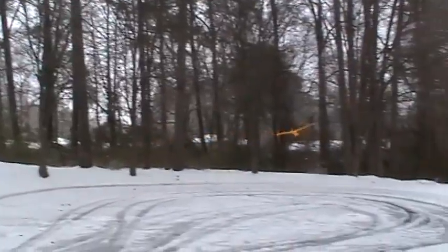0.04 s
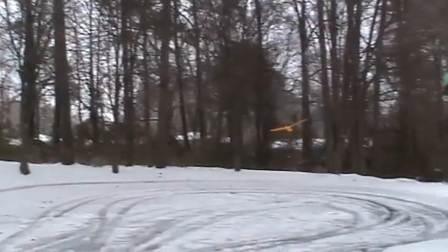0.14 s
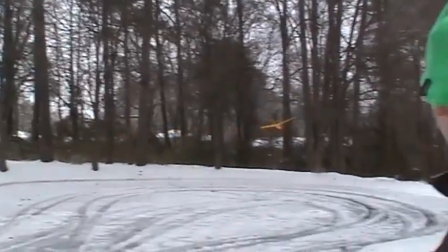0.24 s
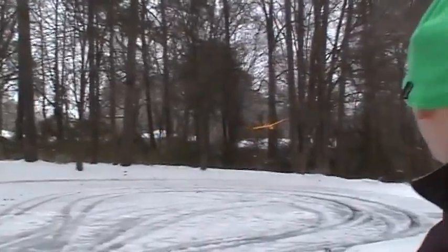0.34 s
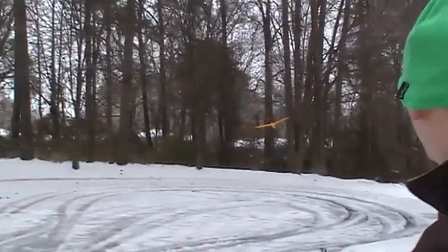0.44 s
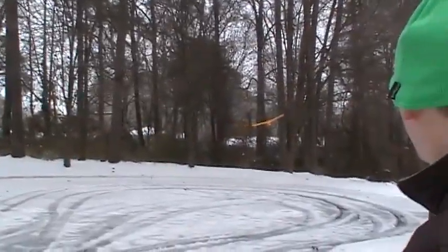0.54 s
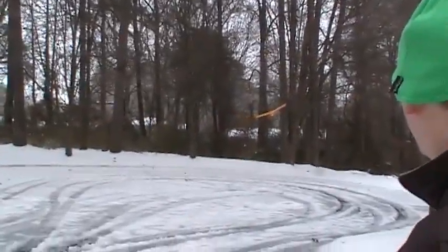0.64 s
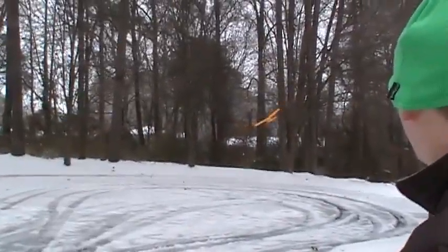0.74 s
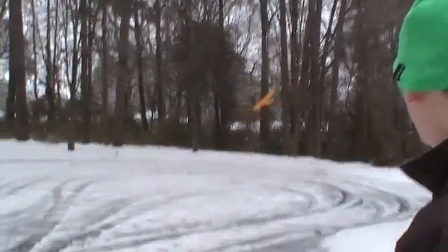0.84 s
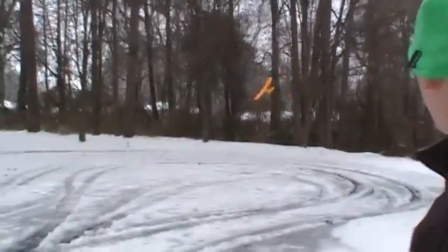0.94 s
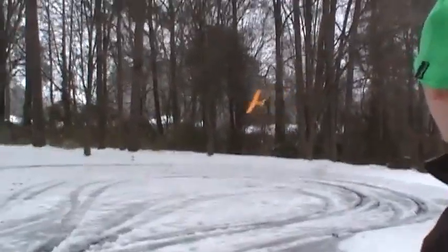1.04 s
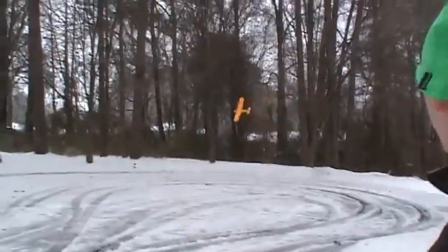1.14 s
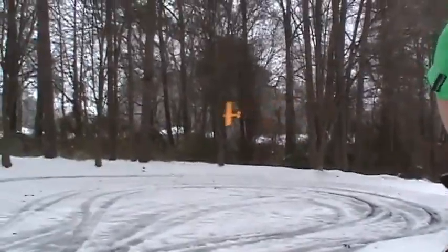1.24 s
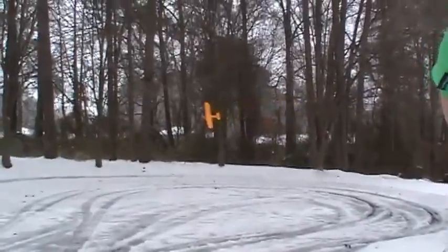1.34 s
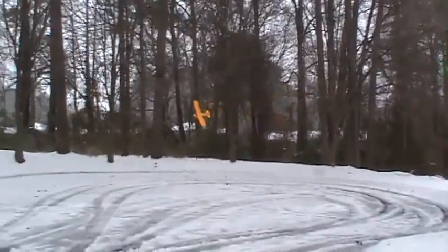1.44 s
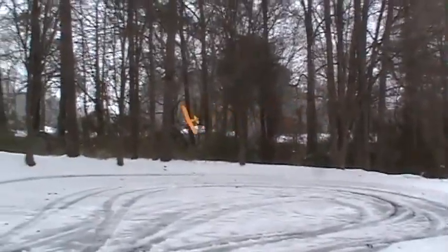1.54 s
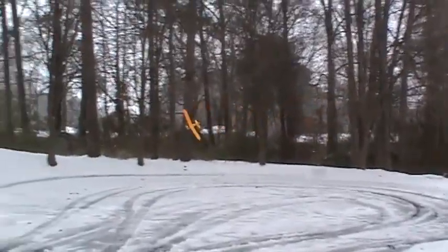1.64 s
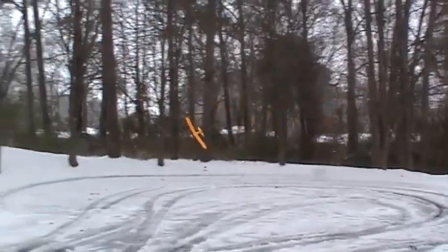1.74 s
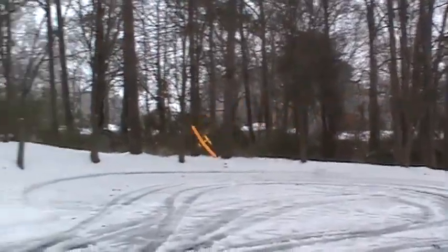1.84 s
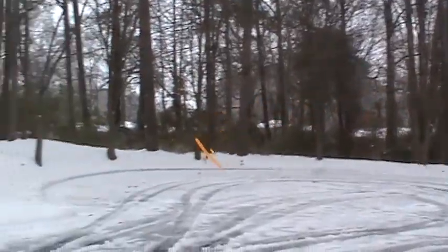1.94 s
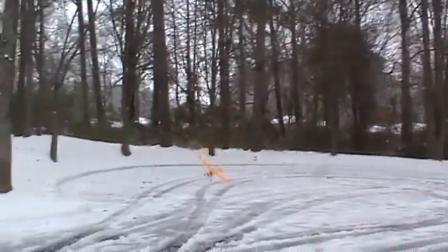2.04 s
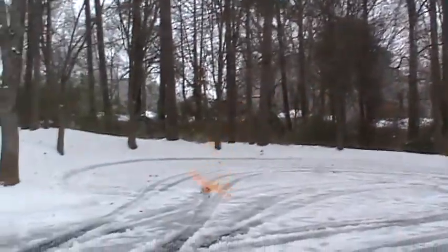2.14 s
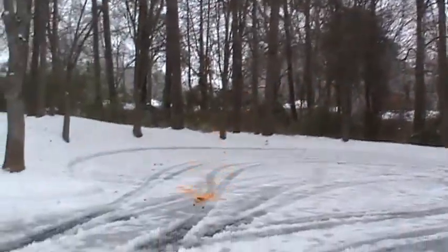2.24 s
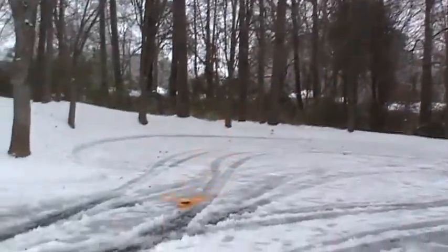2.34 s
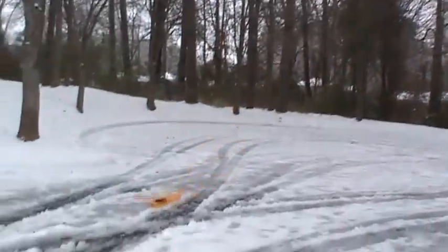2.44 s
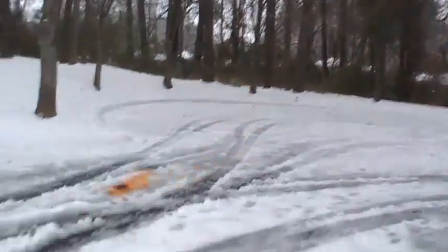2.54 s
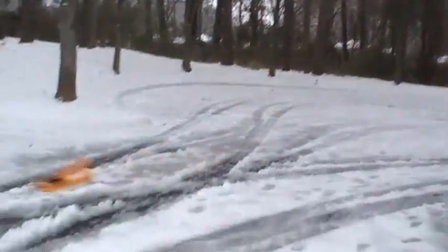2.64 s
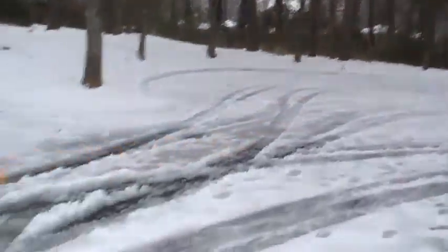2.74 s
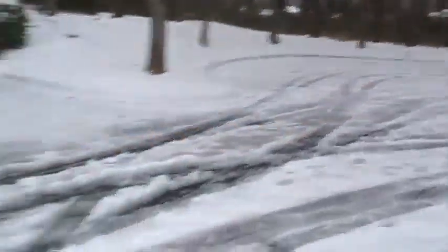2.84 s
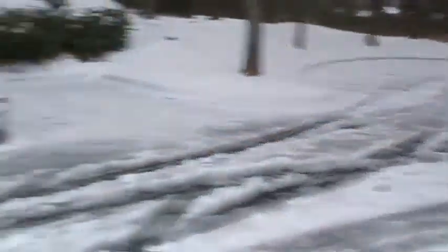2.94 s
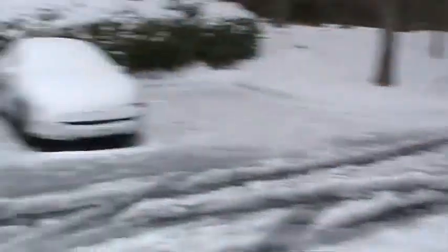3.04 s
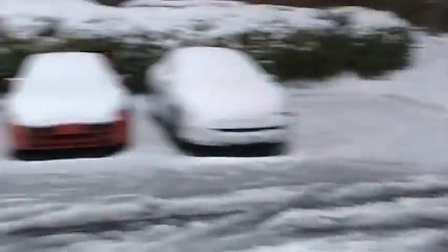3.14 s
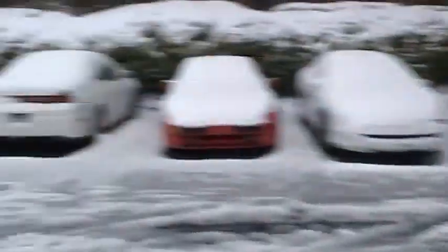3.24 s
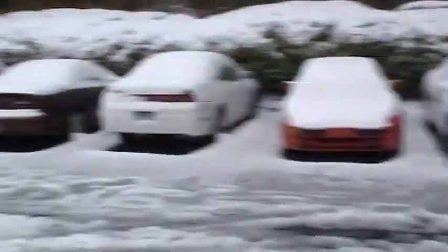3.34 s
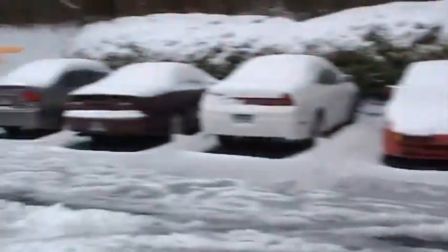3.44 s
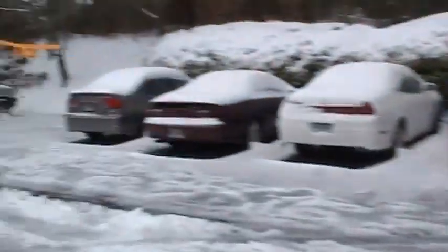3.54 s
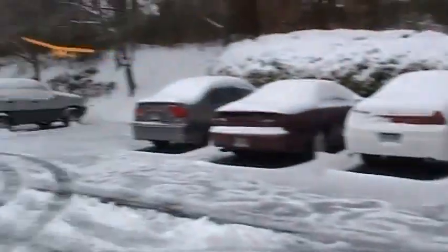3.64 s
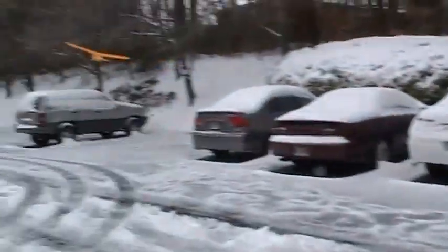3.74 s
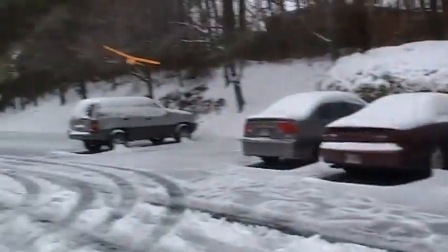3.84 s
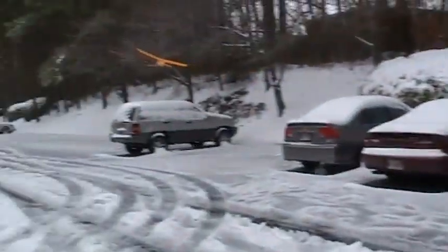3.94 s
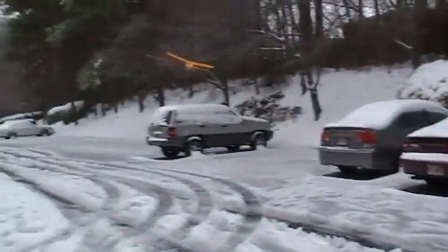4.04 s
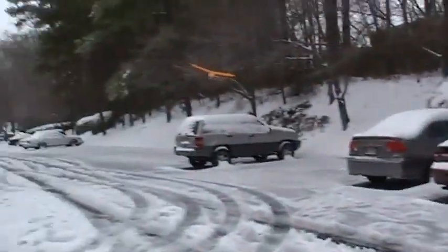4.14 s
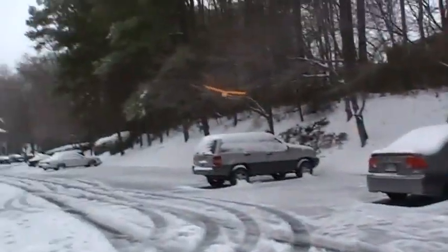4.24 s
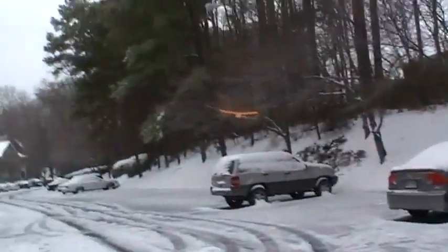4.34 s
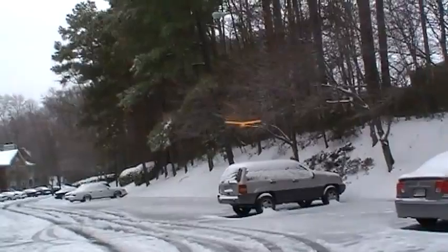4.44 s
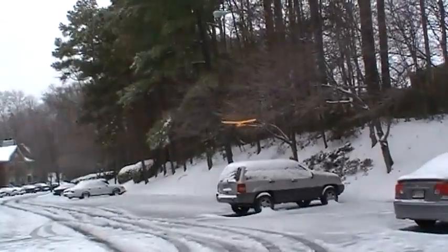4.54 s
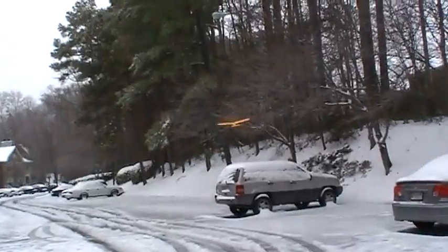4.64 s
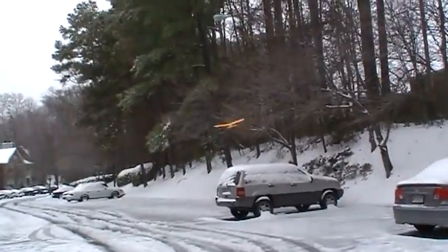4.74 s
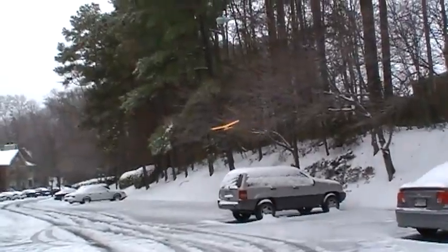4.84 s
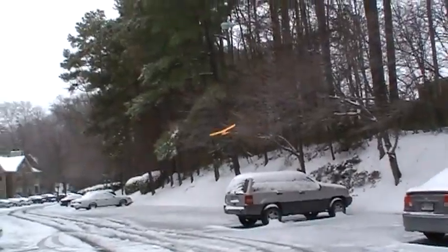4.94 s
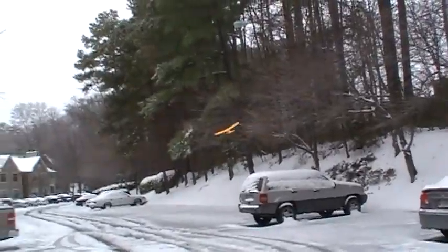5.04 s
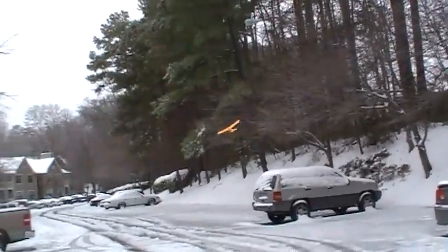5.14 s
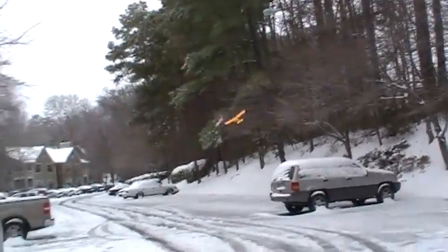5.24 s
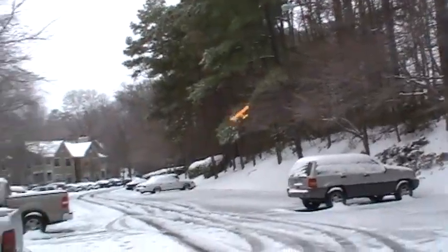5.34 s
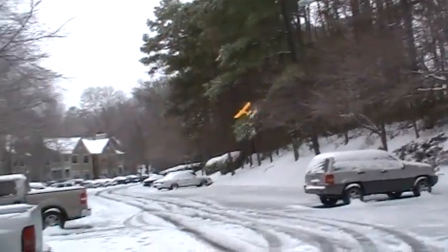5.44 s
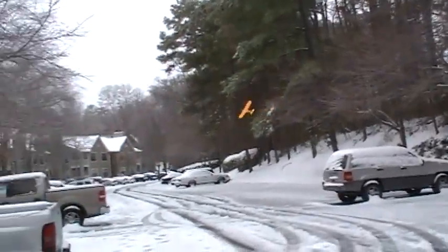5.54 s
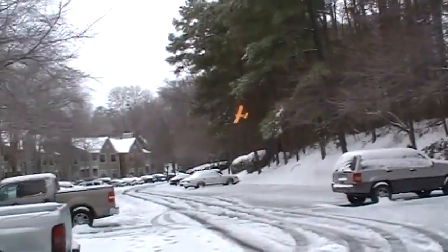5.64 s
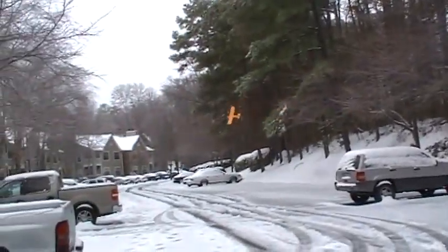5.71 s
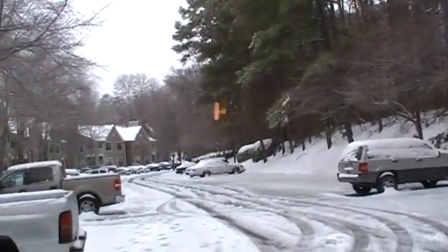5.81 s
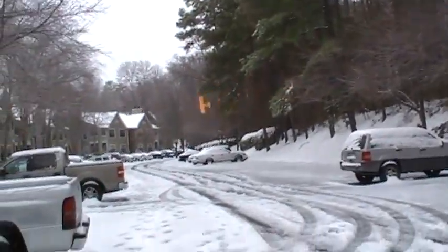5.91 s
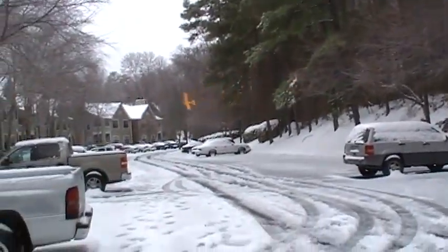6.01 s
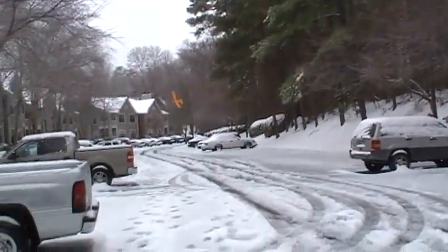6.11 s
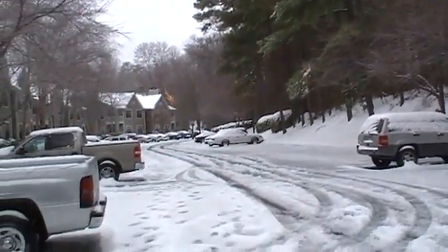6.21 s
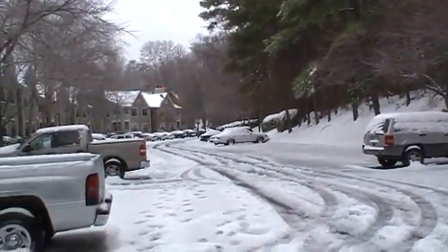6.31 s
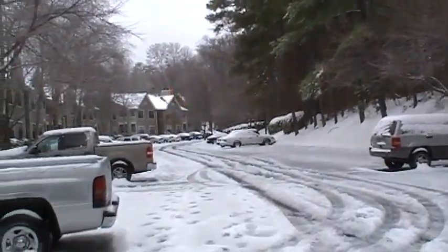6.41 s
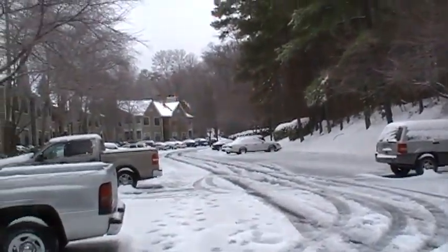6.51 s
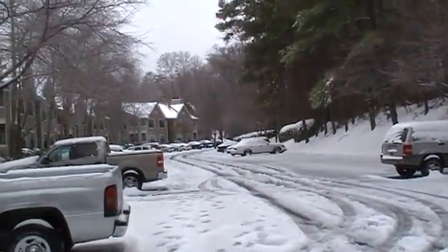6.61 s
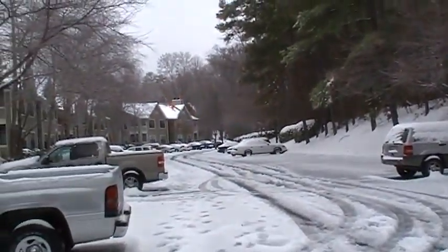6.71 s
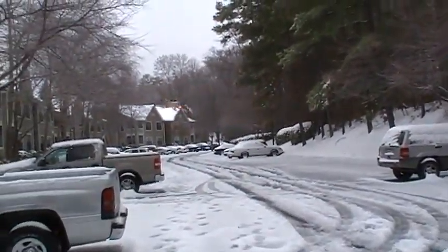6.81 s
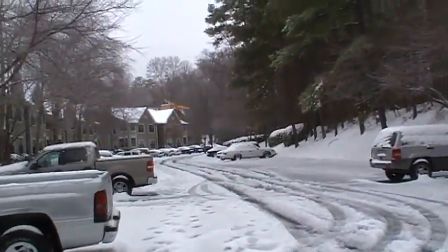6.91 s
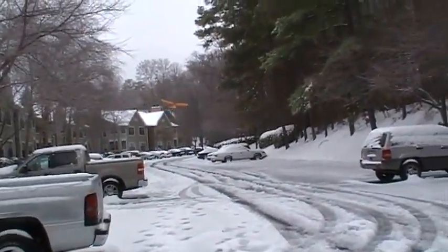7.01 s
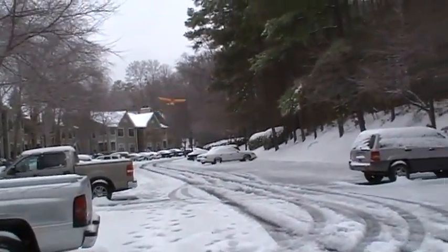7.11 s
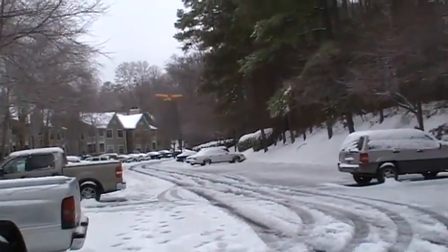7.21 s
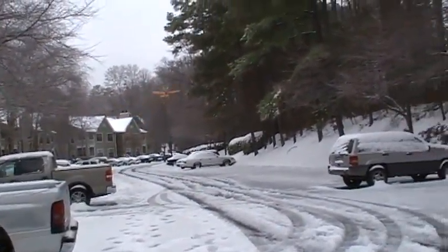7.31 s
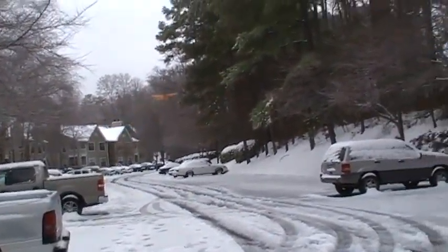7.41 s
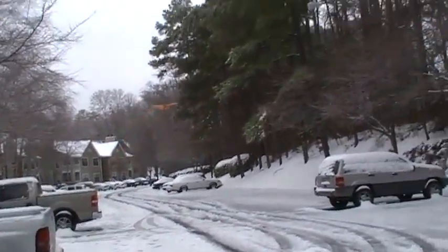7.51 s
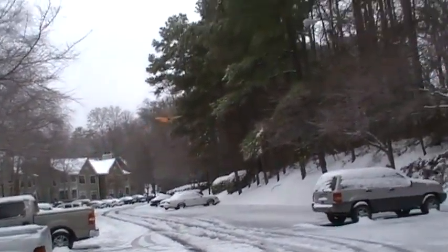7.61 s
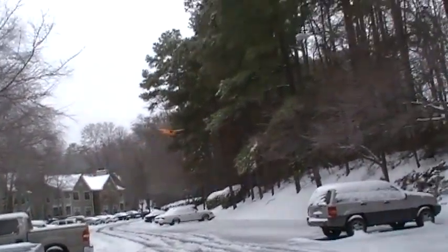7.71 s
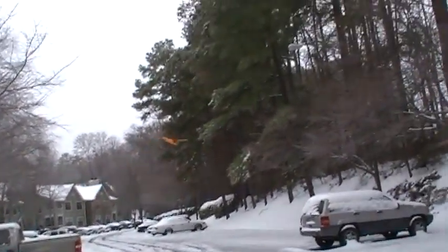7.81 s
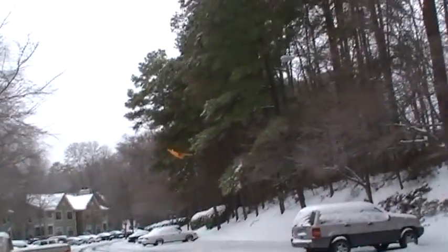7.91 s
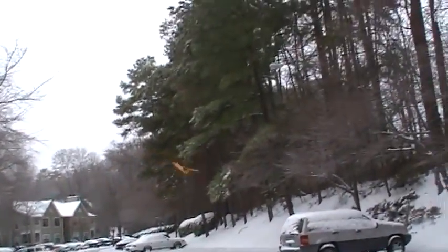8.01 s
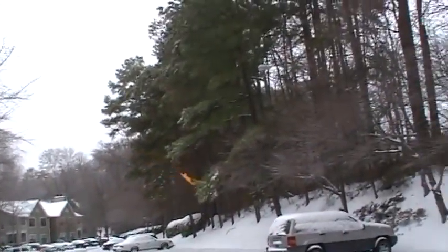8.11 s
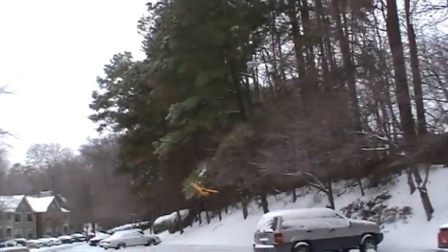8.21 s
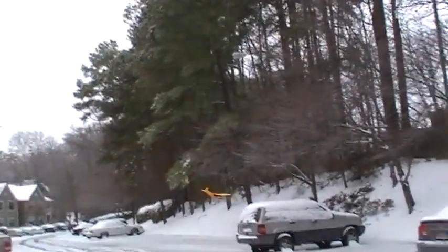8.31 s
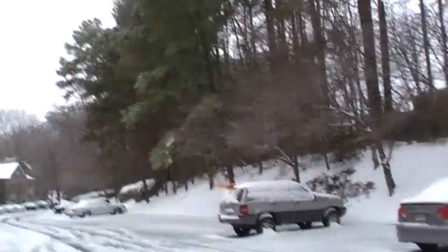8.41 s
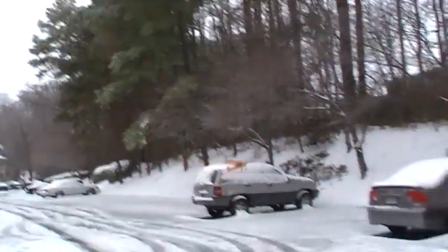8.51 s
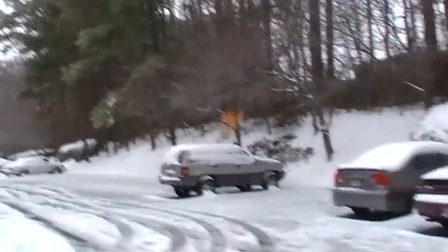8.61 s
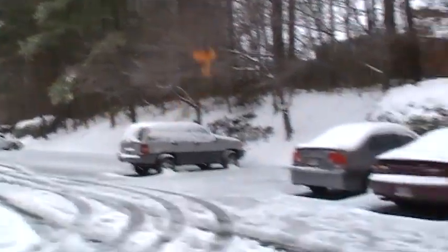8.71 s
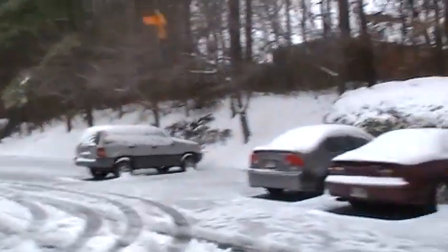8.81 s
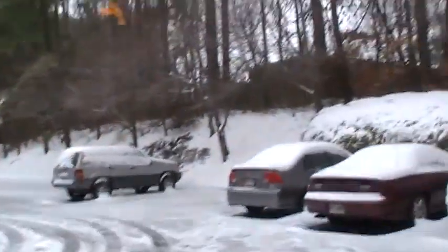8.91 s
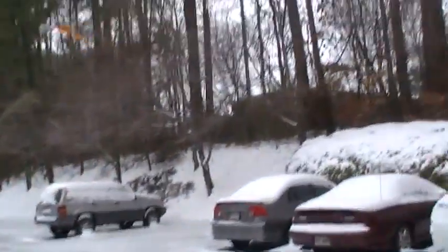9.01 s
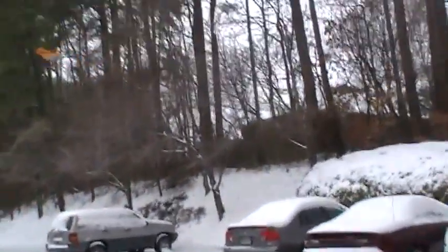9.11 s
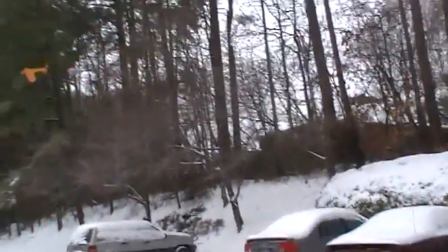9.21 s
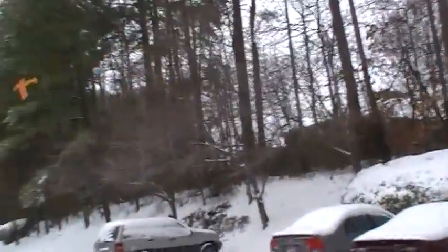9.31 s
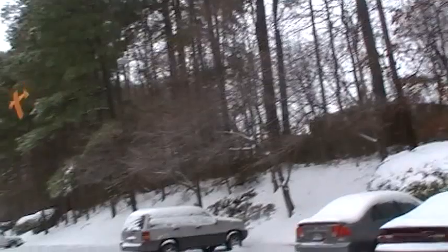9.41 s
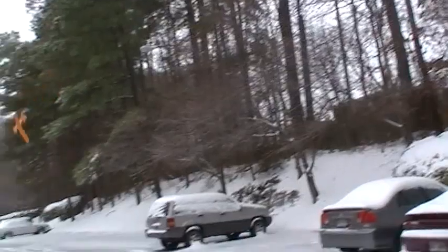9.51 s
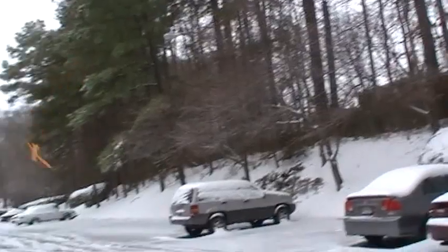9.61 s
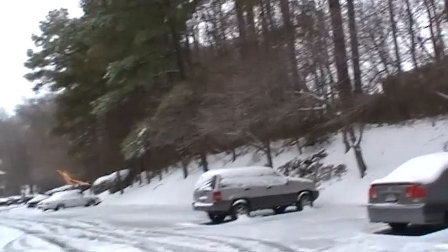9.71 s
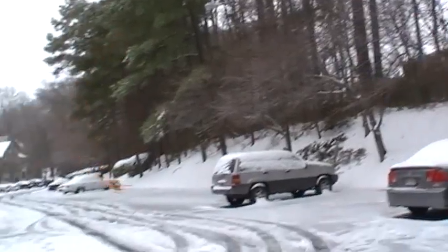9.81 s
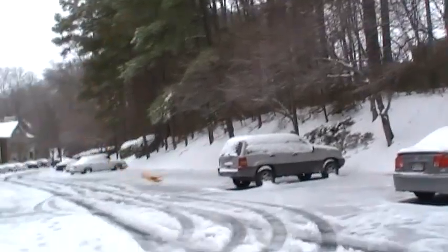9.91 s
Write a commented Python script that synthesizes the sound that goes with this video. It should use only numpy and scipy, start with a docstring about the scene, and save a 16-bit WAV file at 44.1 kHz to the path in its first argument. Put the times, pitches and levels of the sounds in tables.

```python
"""Geared electric plane circling over snow

Heard from the ground near the plane: an 8-tooth pinion drives a 34-tooth wheel, so the tooth whine (sines locked
to the shafts) carries sidebands of both shafts over the rattle and hiss (shaped noise) of gears and propeller.
Birds (gliding sines) call in the trees, damped rings click and knock close to the microphone,
and a far hum and traffic hiss (filtered noise) fill the quiet."""
import sys
import numpy as np
from scipy import signal
from scipy.fft import rfft, irfft, next_fast_len
from scipy.io import wavfile
from scipy.ndimage import uniform_filter1d, map_coordinates

SR = 44100
rng = np.random.default_rng(int(sys.argv[2]) if len(sys.argv) > 2 else 0)


def wav_record(signal):
    """Record a signal, one row per channel, as 16-bit PCM in the file named by sys.argv[1]."""
    frames = np.transpose(np.atleast_2d(signal))
    bounded = np.clip(frames, -1, 1)
    # unit amplitude maps onto the largest positive 16-bit level
    quanta = np.round(bounded * 32767).astype(np.int16)
    wavfile.write(sys.argv[1], SR, quanta)


def field_ratio(decibels):
    """Amplitude ratio for a level in dB (20 dB per decade); scalars and array-likes work."""
    return 10 ** (np.asarray(decibels, dtype=float) / 20)


N = 439236
SECONDS = np.arange(N) / SR
SIDE = np.array([[1], [-1]])  # left port, right port


def unit(x):
    """Scaled to rms 1."""
    return x / np.sqrt(np.mean(x ** 2) + 1e-20)


def along(points, hz):
    """Values of (frequency, value) points, read on a log frequency axis."""
    f, v = np.transpose(points)
    return np.interp(np.log(hz + 0.00076), np.log(f), v)


def curves(rows):
    """One value per sample for each column after the time."""
    s, *columns = np.transpose(rows)
    return [np.interp(SECONDS, s, c) for c in columns]


def wobble(rate_hz):
    """A random curve with rate_hz knots a second, joined by straight lines."""
    return np.interp(np.arange(N) * rate_hz / SR, np.arange(300), rng.standard_normal(300))


def filtered(x, response):
    """x with its spectrum multiplied by a response of frequency."""
    m = next_fast_len(x.shape[-1] + 8192)
    return irfft(rfft(x, m) * response(np.fft.rfftfreq(m, 1 / SR)), m)[..., :x.shape[-1]]


def band(hz, lo_hz, hi_hz):
    """Soft-edged pass band; neighbours add up in power."""
    above_lo = 1 / (1 + (lo_hz / (hz + 1)) ** 20)
    above_hi = 1 / (1 + (hi_hz / (hz + 1)) ** 20)
    return np.sqrt(np.clip(above_lo - above_hi, 0, 1))


def hold(start_s, length_s):
    """Rises to 1, holds and falls, with straight edges."""
    edge_s = 0.048
    inside_s = np.minimum(SECONDS - start_s, start_s + length_s - SECONDS)
    return np.clip(inside_s / edge_s + .5, 0, 1)


# how long the surroundings ring: pitch_hz, t60_s
TREE_DECAY = [(500, 0.6), (3000, 0.43), (10000, 0.024)]


def echoes(x):
    """Trees and parked cars scatter a decaying noise tail that differs in each ear."""
    hz, t, z = signal.stft(rng.standard_normal((2, SR // 2)), SR, nperseg=256)
    decay = field_ratio(-60 * t / along(TREE_DECAY, hz)[:, None])
    tail = signal.istft(z * decay, SR, nperseg=256)[1]
    late = np.pad(x, (700, 0))[None]  # samples before the first echo
    return signal.fftconvolve(late, tail / np.linalg.norm(tail[0]), axes=1)[:, :N]


FAR_DB, FAR_LEAD_RAD = -54, 0.49  # hiss level; the left port is ahead in phase
# spectrum of the distance: pitch_hz, relative level_db per Hz
FAR_SPECTRUM = [(15, -65), (25, -39), (74, -9), (90, -44), (107, 6), (141, -3.5), (200, 3), (372, 1),
                (694, 5.5), (965, 2), (1170, -1), (1370, 0), (1730, 2), (1940, -39), (2600, -44),
                (3380, -41), (5720, -120)]
# likeness of the two ports: pitch_hz, likeness (0-1)
FAR_LIKENESS = [(60, 0.71), (150, 1), (380, 0.34), (950, 0.12)]
# far hum, one row: pitch_hz, width_hz, level_db
FAR_HUM = (108.3, 14.3, -72)
# wind on the ports as the camera swings: time_s, level_db
WIND_SWING = [(0, -96), (3, -94), (3.45, -65), (3.9, -70), (4.4, -78), (5, -97), (9.96, -96)]


def far():
    """Distant traffic hiss, a wavering hum of narrow noise, and low wind rumble on the ports."""
    def mid_side(f):
        turn = np.arccos(np.clip(along(FAR_LIKENESS, f), -1, 1)) / 2
        return field_ratio(along(FAR_SPECTRUM, f)) * np.array([np.cos(turn), np.sin(turn)])

    mid, side = filtered(rng.standard_normal((2, N)), mid_side)
    hiss = field_ratio(FAR_DB + 0.11 * wobble(2.5)) * unit(np.array([mid + side, mid - side]))
    hiss = filtered(hiss, lambda f: np.exp(.5j * SIDE * FAR_LEAD_RAD))
    hum_hz, width_hz, hum_db = FAR_HUM
    shift = np.exp(.5j * SIDE)  # the low hum reaches the ports out of step
    hum = unit(filtered(rng.standard_normal(N), lambda f: shift * np.exp(-((f - hum_hz) / width_hz) ** 2)))
    rumble = unit(filtered(rng.standard_normal(N), lambda f: band(f, 36, 86)))
    wind = field_ratio(curves(WIND_SWING)[0] + 2.5 * wobble(8)) * rumble * np.array([[1], [-.4]])
    return hiss + field_ratio(hum_db) * hum * field_ratio(0.6 * SIDE) + wind


TICK_S = 4.93733
# rings of the snap before its band filter: pitch_hz, level_db, t60_s
SNAP_MODES = [(2900, -28, .002), (5200, -27.5, .002), (8700, -27.5, .0025)]


def tick():
    """One sharp dry snap close to the microphone: a few high modes that die within milliseconds."""
    out, t = np.zeros(N), np.arange(SR // 100) / SR
    ring = sum(field_ratio(db - 60 * t / t60) * np.cos(2 * np.pi * hz * t) for hz, db, t60 in SNAP_MODES)
    out[round(TICK_S * SR):][:len(t)] = ring
    return filtered(out, lambda f: band(f, 1900, 12000)) * field_ratio(1.2 * SIDE)


# contacts near the microphone: start_s, pitch_hz, level_db (before onset and mix), t60_s, noisy share (0-1)
NEAR_KNOCKS = [(3.858, 492, -32.5, 0.21, 0.95), (3.877, 261, -28.5, 0.067, 0.76),
               (3.893, 405, -38, 0.67, 0.88), (5.271, 1790, -36, 0.04, 0.3),
               (5.283, 1780, -24, 0.031, 0.67), (5.287, 825, -32.5, 0.23, 0.97),
               (5.292, 274, -40.5, 0.083, 0.24)]


def knocks():
    """Each contact is a short damped ring mixed with a puff of noise around the same pitch."""
    out, t = np.zeros(N + SR), np.arange(SR // 8) / SR
    for s, hz, db, t60, share in NEAR_KNOCKS:
        puff = unit(filtered(rng.standard_normal(len(t)), lambda f: band(f, 0.41 * hz, 2.64 * hz)))
        share = np.clip(share, 0, 1)
        ring = (1 - share) * np.sin(2 * np.pi * hz * t) + 0.26 * share * puff
        onset = 1 - np.exp(-t * hz * 1.5)
        out[round(s * SR):][:len(t)] += field_ratio(db - 60 * t / t60) * onset * ring
    return out[:N] * field_ratio(1.2 * SIDE)


HOARSE_HZ, RASP_DB = 25, 2  # random spread of pitch and level in the low calls
BIRD_LAG, BIRD_RIGHT_DB = 6, 6  # birds sit to the right: samples late and dB softer at the left port
BIRD_LIFT_DB = 4  # added to the levels in the call and chip tables, but not to their echoes
# two-step falling calls: time_s of the drop, first_hz, second_hz, level_db, overtone_db,
# share of the overtone held after the drop
LOW_CALLS = [(0.744, 1520, 1080, -47.5, -34.5, .4), (1.806, 1520, 1055, -49.5, -35, 0.55),
             (4.026, 1450, 1008, -47.5, -28, 0.28), (4.906, 1450, 998, -44, -28.5, 0.5),
             (6.045, 1400, 980, -44.5, -32.5, 0.6), (6.902, 1337, 1087, -50.5, -38, 1.16),
             (7.28, 1495, 1130, -45.5, -36, 0.44), (8.076, 1570, 1100, -42, -35, 0.87),
             (9.045, 1380, 1050, -57, -31, .3), (9.425, 1400, 1050, -49, -33.5, .4)]
# one low call around its drop: offset_s, height between second and first pitch (0-1),
# shares of the fundamental, the overtone and the held overtone
LOW_CALL_SHAPE = [(-.04, 1, 0, 0, 0), (-.03, 1, .8, 0, 0), (-.02, 1, .9, .25, 0), (-.011, .93, .8, .5, 0),
                  (-.003, .7, .6, .7, 0), (.003, .5, .5, .6, 0), (.006, 0, .45, 0, .55),
                  (.026, 0, .35, 0, .4), (.036, 0, 0, 0, 0)]
# thin rising chips: start_s, length_s, first_hz, last_hz, level_db
RISING_CHIPS = [(1.628, .03, 6800, 9000, -35), (9.178, 0.021, 7100, 8170, -43)]


def birds():
    """A nasal call, strong in overtones, sags, breaks downward and holds; a thin chip glides upward."""
    out, t = np.zeros(N + SR), np.arange(-.045, .06, 1 / SR)
    offset_s, *shape = np.transpose(LOW_CALL_SHAPE)
    height, low, falling, held = [np.interp(t, offset_s, c) for c in shape]
    for s, first_hz, second_hz, db, over_db, share in LOW_CALLS:
        hoarse = np.repeat(rng.standard_normal(len(t) // 80 + 1), 80)[:len(t)]
        hz = second_hz + (first_hz - second_hz) * height + HOARSE_HZ * hoarse
        turn = 2 * np.pi * np.cumsum(hz) / SR
        overtones = np.sin(2 * turn) + 0.2 * np.sin(3 * turn)
        call = field_ratio(db) * low * np.sin(turn) + field_ratio(over_db) * (falling + share * held) * overtones
        rasp = np.interp(t, np.linspace(t[0], t[-1], 24), rng.standard_normal(24))
        out[round((s - .045) * SR):][:len(t)] += call * field_ratio(RASP_DB * rasp)
    for s, length_s, first_hz, last_hz, db in RISING_CHIPS:
        count = round(length_s * SR)
        chip = np.sin(2 * np.pi * np.cumsum(np.linspace(first_hz, last_hz, count)) / SR)
        out[round(s * SR):][:count] += field_ratio(db) * np.hanning(count) ** 0.3 * chip
    right = out[:N]
    left = field_ratio(-BIRD_RIGHT_DB) * map_coordinates(out, [np.arange(N) - BIRD_LAG])
    return field_ratio(BIRD_LIFT_DB) * np.array([left, right]) + field_ratio(-15) * echoes(right)


# a weak tone that climbs: time_s, pitch_hz, level_db
FAINT_TONE = [(.76, 1850, -73), (.85, 1850, -58.5), (1.08, 1860, -59), (1.19, 1985, -56), (1.42, 1995, -57),
              (1.5, 1995, -80)]


def faint():
    """A weak wavering tone that steps upward."""
    hz, db = curves(FAINT_TONE)
    turns = np.cumsum(hz) / SR + .12 * wobble(18)
    return field_ratio(db + 2 * wobble(17)) * np.sin(2 * np.pi * turns)


# rough bands that ride with the gears: start_s, length_s, multiple of the tooth rate, width_hz, level_db
GEAR_HUMPS = [(7.5, .9, 1.97, 1100, -49.5), (8.4, 0.31, 2.005, 350, -45), (8.3, .44, .341, 63, -55)]


def humps(teeth):
    """Slow noise shifted to a multiple of the tooth rate, so that it glides with the speed."""
    out = np.zeros(N)
    for s, length_s, multiple, width_hz, db in GEAR_HUMPS:
        a, b = filtered(rng.standard_normal((2, N)), lambda f: np.exp(-(2 * f / width_hz) ** 2))
        turn = 2 * np.pi * multiple * teeth
        out += field_ratio(db) * hold(s, length_s) * unit(a * np.cos(turn) + b * np.sin(turn))
    return out


# bands of rattle noise that surge briefly: start_s, length_s, pitch_hz, width_hz, level_db
RATTLE_SURGES = [(0.83, 0.24, 3460, 600, -50.5), (3, 0.11, 4600, 900, -38), (3.3, 0.12, 4200, 120, -39.5),
                 (2.95, 0.068, 3970, 800, -35), (1.32, 0.11, 3330, 503, -49.5), (2.3, 0.51, 2300, 40, -56),
                 (2.8, 0.46, 1348, 60, -53.5), (2.932, 0.11, 5800, 1900, -35),
                 (3.173, 0.066, 6100, 2100, -32), (6.35, 0.49, 7500, 460, -56.5),
                 (8.65, .24, 5100, 1100, -48), (3.42, 0.074, 11000, 500, -39)]


def surges():
    """Noise in a narrow or broad band that swells, holds and fades."""
    out = np.zeros(N)
    for s, length_s, hz, width_hz, db in RATTLE_SURGES:
        noise = filtered(rng.standard_normal(N), lambda f: np.exp(-(2 * (f - hz) / width_hz) ** 2))
        out += field_ratio(db) * hold(s, length_s) * unit(noise)
    return out


# spectrum laid along the gears: multiple of the tooth rate, relative level_db
RATTLE_SHAPE = [(.05, -15), (.2, 0), (.45, -4), (.72, -1.5), (.9, 1.5), (1.02, 4.5), (1.3, -5), (1.6, -4.5),
                (2, -0.5), (2.2, 0), (2.5, -0.5), (2.9, -1.5), (3.3, 0.5), (4, -1.5), (5.5, -3.5)]
PINION_TEETH, WHEEL_TEETH = 8, 34


def rattle(teeth):
    """Noise laid out along the shaft angle, so that its humps follow the speed; it beats with each blade."""
    per_tooth = 16  # noise samples per tooth
    size = int(teeth[-1] * per_tooth) + 16
    multiple, _, z = signal.stft(rng.standard_normal((2, size)), per_tooth, nperseg=512)
    patches = uniform_filter1d(rng.standard_normal(z.shape[1:]), 3, 0)
    patches = unit(uniform_filter1d(patches, 24, 1))
    pair = signal.istft(z * field_ratio(along(RATTLE_SHAPE, multiple)[:, None] + 2.4 * patches), nperseg=512)[1]
    pair = np.array([map_coordinates(p, [teeth * per_tooth]) for p in pair])
    blades = 0.12 * np.cos(4 * np.pi * teeth / WHEEL_TEETH)  # twice a wheel turn
    pinion = 0.14 * np.cos(2 * np.pi * teeth / PINION_TEETH)
    return unit(pair * (1 + blades + pinion) * field_ratio(1.1 * wobble(14)))


def line(teeth, pinion, wheel, flutter_db):
    """A shaft-locked tone, rms 1 before it fades and wavers as the path through the air changes."""
    turns = teeth * (pinion / PINION_TEETH + wheel / WHEEL_TEETH) + rng.random() + .1 * wobble(22)
    return np.sqrt(2) * field_ratio(flutter_db * wobble(17)) * np.sin(2 * np.pi * turns)


SIDEBAND_DB = 1.3  # lost per wheel sideband
# weaker lines: cycles per pinion turn, level_db against the rattle before colouring
WEAK_FAMILIES = [(0, -11), (2, -23.5), (3, -28.5), (4, -29), (5, -28.5), (7, -30), (8, -24), (9, -36),
                 (10, -31.5), (11, -31.5), (13, -30), (15, -28), (16, -20), (17, -28.5), (23, -20),
                 (24, -23), (25, -21.5)]


def weak_lines(teeth):
    """Pinion harmonics with wheel sidebands falling away on each side; the strong lines are left out."""
    out = np.zeros(N)
    for p, db in WEAK_FAMILIES:
        for q in range(-3, 4):
            if (p, q) not in STRONG_LINES and p + q > 1:
                out += field_ratio(db - SIDEBAND_DB * abs(q)) * line(teeth, p, q, flutter_db=4)
    return out


# foam airframe resonances: pitch_hz, width_hz, gain_db
BODY_RESONANCES = [(1345, 210, 6), (1860, 710, 9.5), (3880, 2150, 12.5)]


def airframe(pair):
    """The foam airframe lifts broad resonances, whose gains add in dB."""
    def gain(f):
        return field_ratio(sum(db / (1 + (2 * (f - hz) / width_hz) ** 2) for hz, width_hz, db in BODY_RESONANCES))

    return filtered(pair, gain)


USUAL_DB = -50  # level at the middle of the circuit


def follow(row, level_db, heading):
    """Level in dB from distance and heading; row: dB against the level, dB per dB of nearness, dB nose-on."""
    db, near, nose_db = row
    return USUAL_DB + db + near * (level_db - USUAL_DB) + nose_db * heading


# borders of the frequency ranges: edge_hz
RANGE_EDGES = [250, 2600, 4700, 6900, 8500, 11500, 16000]
# how each range follows the flight: level_db against the level, dB per dB of nearness, dB nose-on
RANGE_FOLLOW = [(-9, 1.3, -2), (-1, 1, -0.5), (-4.5, 1.5, 0.5), (-4, 0.55, 9), (-2, 1.37, 6), (1, 1.32, 3)]


def by_distance(pair, level_db, heading):
    """Each frequency range gets its own level by distance and heading, under shared gusts."""
    gusts = field_ratio(0.54 * wobble(4.4))  # the air between plane and microphone is unsteady
    out = np.zeros((2, N))
    for row, lo, hi in zip(RANGE_FOLLOW, RANGE_EDGES, RANGE_EDGES[1:]):
        out += field_ratio(follow(row, level_db, heading)) * unit(filtered(pair, lambda f: band(f, lo, hi)))
    return gusts * out


# a line stands out while the turning airframe beams it at the microphone:
# (cycles per pinion turn, cycles per wheel turn) -> start_s, length_s, gain_db
LINE_BEAMS = {(16, 0): [(0, .3, 2), (.5, 0.56, 15), (2.0, 0.84, 14.5), (2.9, 0.92, 12.5), (8.3, .42, 10),
              (8.9, 0.36, 11)], (23, 0): [(3.4, 2.4, 15.5), (7.1, 0.77, 9)], (7, 0): [(5.4, 0.45, 16),
              (6.1, 0.23, 15)], (9, 0): [(.85, 0.39, 10), (1.3, 0.16, 18), (2.65, 0.37, 7),
              (3.15, 0.32, 10), (3.45, 0.19, 12.5), (5.35, 0.28, 20.5), (6.05, 0.93, 15.5),
              (7.75, 0.36, 12), (8.4, 0.65, 11)], (10, 0): [(.85, 0.2, 8), (2.65, 0.303, 5),
              (3.28, 0.24, 11), (4.55, .6, 2), (7.2, .4, 5)], (8, -2): [(7.35, 0.22, 20), (8.33, 0.61, 15)],
              (8, 2): [(.8, 0.24, 13), (1.28, 0.16, 11), (2.85, 0.15, 11), (5.45, .33, 11), (8.2, 0.18, 17),
              (8.45, .62, 11), (9.1, 0.31, 7)], (9, 1): [(.9, 0.28, 10), (2.55, .3, 11), (3.15, 0.35, 17),
              (5.22, .25, 13), (7.45, 0.52, 8)], (0, 6): [(8.35, 0.41, 13.5)], (2, 1): [(9.1, .3, 12)],
              (12, 0): [(3.28, 0.23, 12), (8.17, .14, 12)], (1, 2): [(2.1, 1.44, 8.5), (5.5, 2.8, 7.5)],
              (1, 0): [(2.2, 0.74, 7.5), (8.3, 0.31, 9.5)]}


def beams(pinion_wheel):
    """Gain in dB over the moments when one line is beamed."""
    return sum(db * hold(s, length_s) for s, length_s, db in LINE_BEAMS.get(pinion_wheel, []))


SHAFT_FLUTTER_DB, SHAFT_SWELL_DB = 1.1, .7  # quick fading of all strong lines, slow fading of the later ones
# the strong lines, whine and its sideband pair first: cycles per pinion turn, cycles per wheel turn
STRONG_LINES = [(8, 0), (8, -1), (8, 1), (1, 0), (1, 2), (0, 3), (7, 0), (9, 0), (10, 0), (16, 0), (23, 0),
                (8, -2), (8, 2), (9, 1), (0, 6), (2, 1), (12, 0)]
# the tooth whine swells and fades as the airframe turns: time_s, level_db
WHINE_LEVEL = [(0, -45.5), (.12, -42.5), (.27, -41.5), (.48, -49), (.63, -44), (.72, -50), (.77, -54),
               (1.1, -56), (1.45, -60), (1.74, -55), (2.04, -53.5), (2.13, -46), (2.25, -43), (2.34, -48.5),
               (2.49, -42.5), (2.64, -46), (2.76, -42), (2.85, -33.5), (2.94, -33), (3.0, -36.5),
               (3.06, -50), (3.15, -41), (3.39, -33.5), (3.52, -42), (3.6, -45), (3.66, -49), (3.78, -43),
               (3.9, -40.5), (3.99, -47.5), (4.08, -49.5), (4.2, -46), (4.33, -52), (4.41, -45),
               (4.5, -52.5), (4.62, -46.5), (4.7, -53), (4.83, -55), (5.07, -51.5), (5.19, -60),
               (5.28, -53), (5.46, -54), (5.6, -57), (5.8, -63), (5.9, -49), (5.97, -46), (6.14, -48.5),
               (6.25, -57), (6.6, -58), (6.93, -69), (7.03, -47), (7.11, -56), (7.2, -48), (7.5, -47),
               (7.58, -44.5), (7.68, -52), (7.8, -57), (8.17, -58), (8.25, -43.5), (8.52, -47),
               (8.61, -32.5), (8.68, -39), (8.75, -47), (8.83, -35.5), (8.9, -33.5), (9.0, -45),
               (9.12, -40), (9.21, -50), (9.28, -38.5), (9.4, -41), (9.5, -50), (9.68, -65), (9.82, -49),
               (9.96, -54)]
# uneven running of the wheel: time_s, lower sideband level_db, upper sideband level_db
WHEEL_RUNOUT = [(0.0, -71, -58.0), (0.06, -60, -50), (0.18, -58, -63), (0.39, -66, -52), (2.01, -76, -88),
                (2.28, -48, -62), (2.4, -65, -53), (2.73, -56.5, -56), (2.94, -46, -41), (3.39, -45, -68),
                (3.54, -49, -46), (3.69, -47.5, -58), (4.02, -56, -53), (4.2, -62.5, -67), (4.41, -55, -67),
                (5.22, -65.0, -65), (6.12, -58, -65), (6.27, -65.5, -60), (6.48, -54, -59),
                (6.87, -60, -74), (7.47, -47.5, -57.0), (7.74, -49.5, -59), (7.98, -52, -59),
                (8.13, -56, -62), (8.22, -49, -52.0), (8.37, -61, -60), (8.46, -40, -63), (8.58, -41, -43),
                (8.7, -44, -37), (8.88, -45, -43), (9.09, -44, -49), (9.42, -51, -50), (9.6, -50.5, -61.5),
                (9.96, -52.5, -56)]
# the other strong lines in order: level_db against the level, dB per dB of nearness, dB nose-on
SHAFT_FOLLOW = [(-24.5, 0.26, -5), (-27.5, 1.29, -0.5), (-30, 1.64, -0.5), (-17.5, 1.32, 2),
                (-17, 1.5, 0.5), (-15, 1, -9.5), (-19.5, 1.5, 2.5), (-14.5, -0.3, 16), (-20.5, 1, 5),
                (-17.5, 1, -9), (-12.5, 0, 13), (-29, 1, -4), (-34.5, 2, -5), (-19, 1, 2)]


def strong_lines(teeth, level_db, heading):
    """The tooth whine, its wheel sidebands and the loudest shaft lines, each with a moving level."""
    line_db = curves(WHINE_LEVEL) + curves(WHEEL_RUNOUT)
    for row, pinion_wheel in zip(SHAFT_FOLLOW, STRONG_LINES[3:]):
        swell_db = SHAFT_SWELL_DB * wobble(2.37)
        line_db.append(follow(row, level_db, heading) + swell_db + beams(pinion_wheel))
    return sum(field_ratio(db) * line(teeth, p, q, SHAFT_FLUTTER_DB) for db, (p, q) in zip(line_db, STRONG_LINES))


PORT_DB, SHADOW_DB = 2, 7  # the left port is hotter; extra left-right dB with the plane fully to one side
LEAD_RAD = 0.4  # mid frequencies reach the left port ahead in phase
# where the plane is, left positive: time_s, bearing (-1 to 1)
PLANE_BEARING = [(0, -0.2), (.75, -0.00062), (1.75, 0.14), (2.3, -0.03), (2.75, 0.7), (3.2, 0.92),
                 (3.75, 0.34), (4.3, 0.11), (5.3, 0.22), (6.2, 0.28), (7.5, 0.26), (8.7, 0.03), (9.2, 0.66),
                 (9.96, 0.41)]


def ports(pair):
    """The bearing shifts arrival and phase at the two ports, and level between the bass and the very top."""
    bearing = curves(PLANE_BEARING)[0]
    early = [map_coordinates(x, [np.arange(N) + s * .85 * bearing]) for x, s in zip(pair, (1, -1))]
    analytic = signal.hilbert(early, next_fast_len(N))[:, :N]
    ahead = (analytic * np.exp(1j * SIDE * .45 * bearing)).real
    ahead = filtered(ahead, lambda f: np.exp(.5j * SIDE * LEAD_RAD * band(f, 500, 4300)))
    bass = filtered(ahead, lambda f: 1 / (1 + (f / 1500) ** 4))  # long waves bend round the camera body
    top = filtered(ahead, lambda f: 1 / (1 + (12500 / (f + 1)) ** 8))  # arrives alike in level
    alike = bass + top
    return alike + (ahead - alike) * field_ratio(SIDE * (PORT_DB + SHADOW_DB * bearing) / 2)


# throttle, load and approach speed together: time_s, tooth_hz (teeth heard meeting per second)
GEAR_SPEED = [(0.0, 2830), (0.14, 2893), (0.28, 2926), (0.42, 2929), (0.7, 3052), (0.95, 2963), (1.4, 2944),
              (1.68, 2995), (1.96, 3103), (2.38, 3081), (2.7, 3115), (2.85, 3091), (3.08, 3011),
              (3.5, 3197), (4.5, 3210), (5.15, 3192), (5.32, 3157), (5.58, 3155), (5.78, 3259),
              (6.14, 3380), (6.62, 3385), (7.0, 3353), (7.28, 3473), (7.56, 3560), (8.05, 3648),
              (8.26, 3772), (8.4, 3856), (8.52, 3880), (8.7, 3748), (8.94, 3510), (9.38, 3222), (9.5, 3190),
              (9.96, 3025)]
# the circuit: time_s, level_db, heading (1 nose toward the microphone, -1 side or tail toward it)
FLIGHT_PATH = [(0, -50.5, 0.096), (.3, -50.5, -0.57), (.7, -51.5, -0.14), (1.3, -52.5, -0.71),
               (1.5, -53, -0.28), (1.68, -50.5, 0.043), (2.05, -49.5, 0.32), (2.25, -46.5, 0.31),
               (2.64, -42.5, 0.073), (2.8, -42.5, -0.67), (2.97, -41, -0.75), (3.1, -41, -1.1),
               (3.36, -42.5, -0.59), (3.6, -45.5, 0.22), (3.8, -46.5, -0.49), (4.3, -51, -0.34),
               (4.8, -52.5, -0.46), (5.3, -54.5, -0.47), (5.65, -55, -0.74), (6.05, -52.5, -0.99),
               (6.4, -54, 0.086), (6.8, -53, -0.26), (7.45, -52, 0.085), (7.9, -49, 0.13),
               (8.3, -47.5, 0.18), (8.6, -45.5, -0.2), (8.85, -44.5, -0.38), (9.1, -46.5, -0.9),
               (9.35, -51, -0.95), (9.65, -49.5, -0.38), (9.96, -49, -0.13)]


def plane():
    """Gear lines and rattle, coloured by distance and heading, placed by level and arrival time."""
    tooth_hz, = curves(GEAR_SPEED)
    level_db, heading = curves(FLIGHT_PATH)
    teeth = np.cumsum(tooth_hz) / SR
    common, own = rattle(teeth)
    # scattered sound reaches the two ports unlike
    pair = airframe(np.array([common + weak_lines(teeth), 0.51 * own]))
    common, own = by_distance(pair, level_db, heading)
    common = common + surges() + humps(teeth) + faint()
    tones = strong_lines(teeth, level_db, heading)
    direct = ports([common + tones + own, common + tones - own])
    return direct + field_ratio(-15) * echoes(tones)


def scene():
    """Distance, near clicks and knocks, birds and the plane."""
    return far() + tick() + knocks() + birds() + plane()


def band_limit(x):
    """A steep low-pass at the top of the band."""
    return signal.sosfilt(signal.butter(12, 16240, fs=SR, output="sos"), x)


# response of the small microphone: pitch_hz, gain_db
MICROPHONE_RESPONSE = [(100, -0.5), (10000, 0.5), (11500, -6.5), (13500, -13), (16000, -16)]


def record(dry):
    """The small microphone loses the top octave."""
    mix = filtered(dry, lambda f: field_ratio(along(MICROPHONE_RESPONSE, f)))
    return band_limit(mix)


dry = scene()
out = record(dry)
wav_record(out)
```